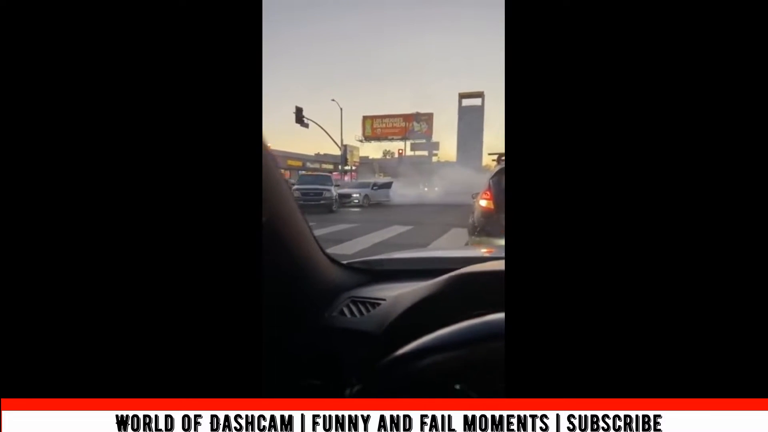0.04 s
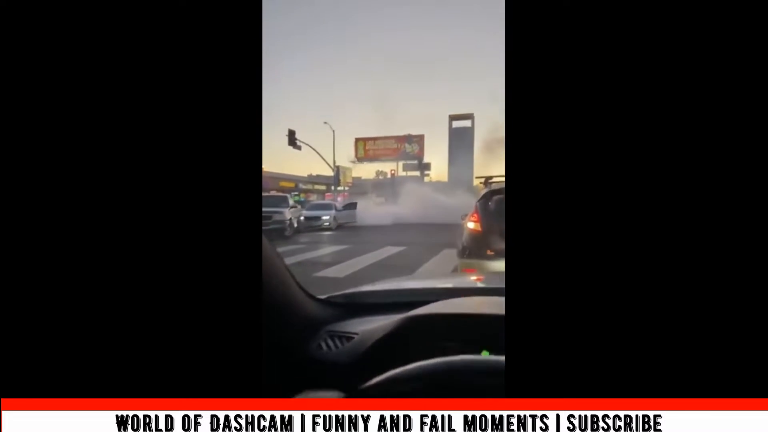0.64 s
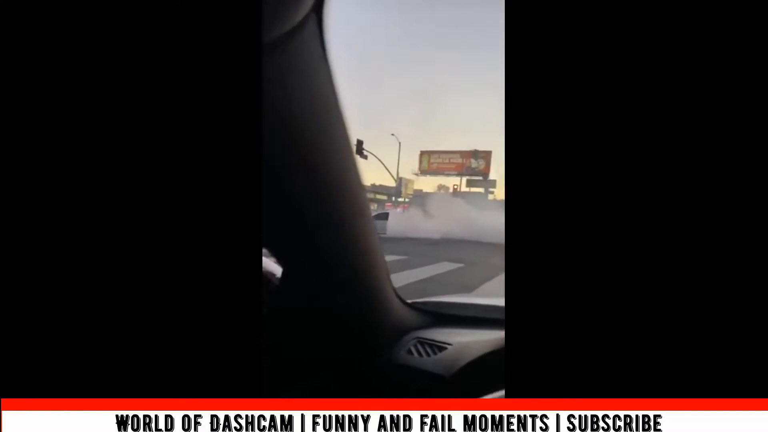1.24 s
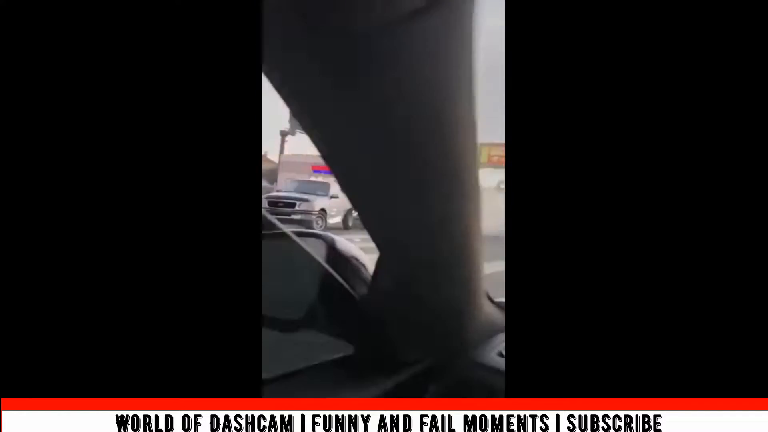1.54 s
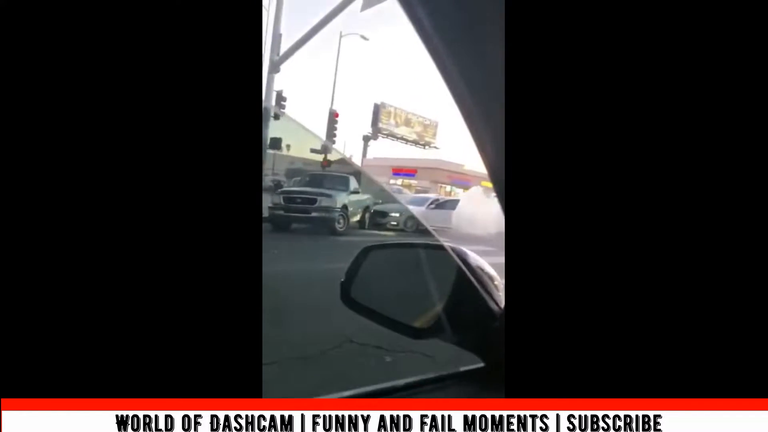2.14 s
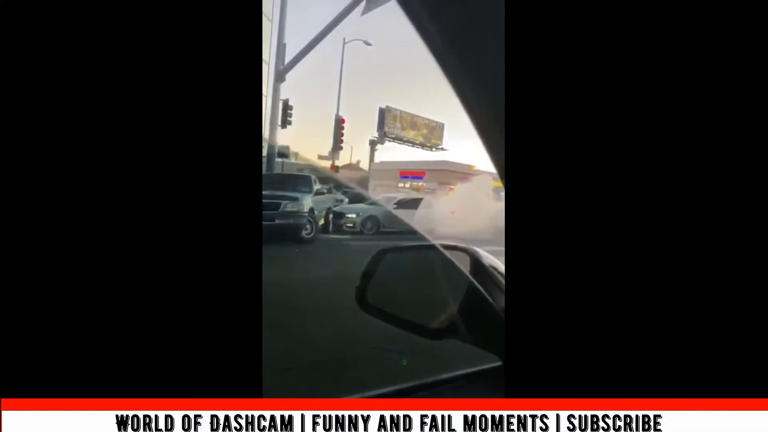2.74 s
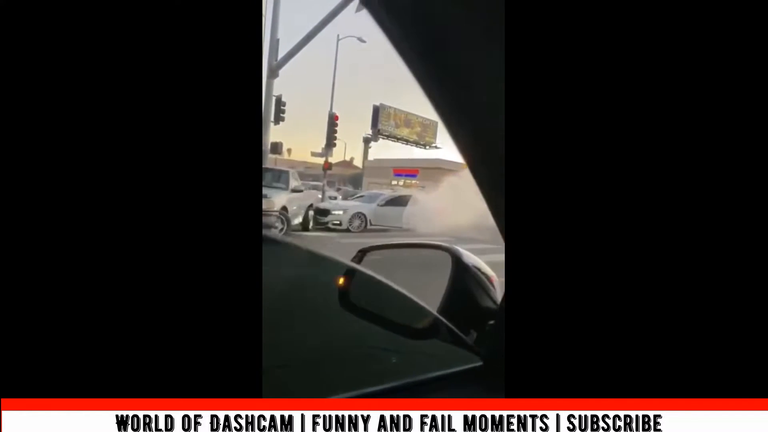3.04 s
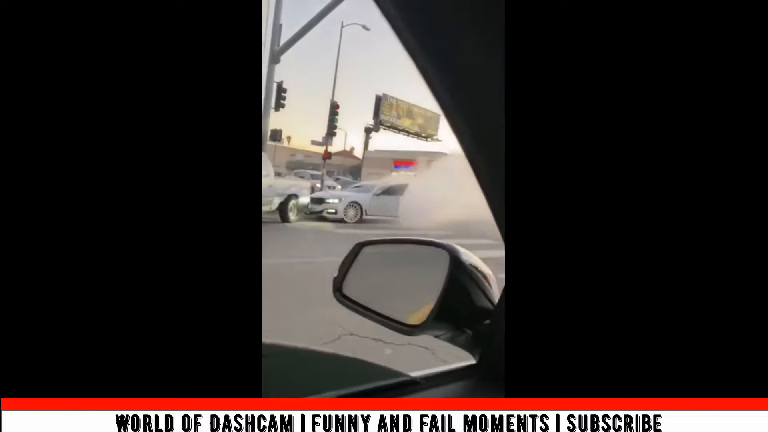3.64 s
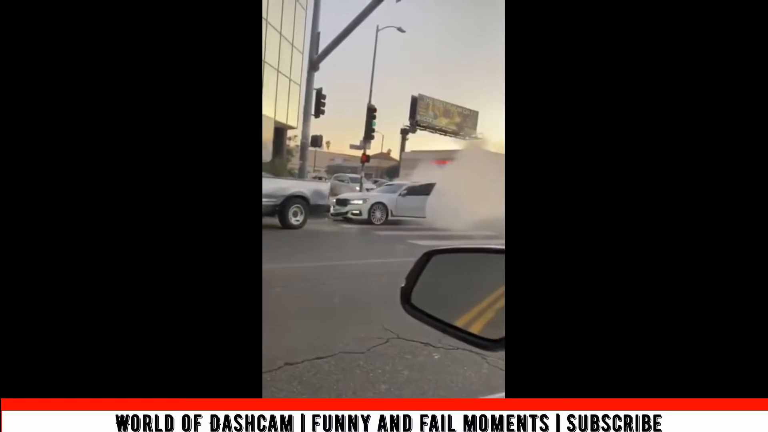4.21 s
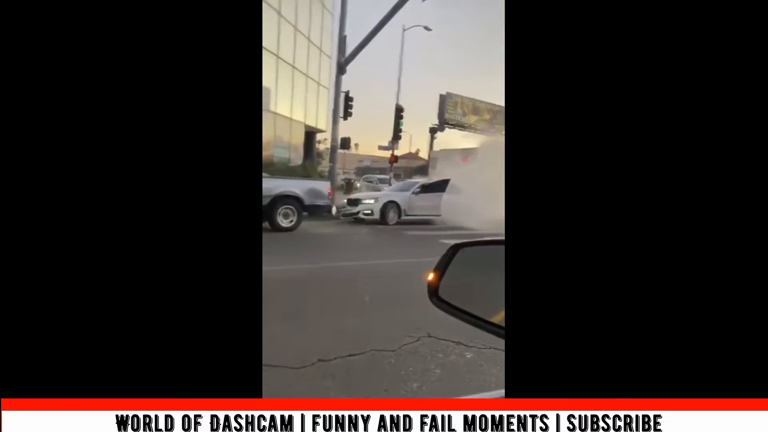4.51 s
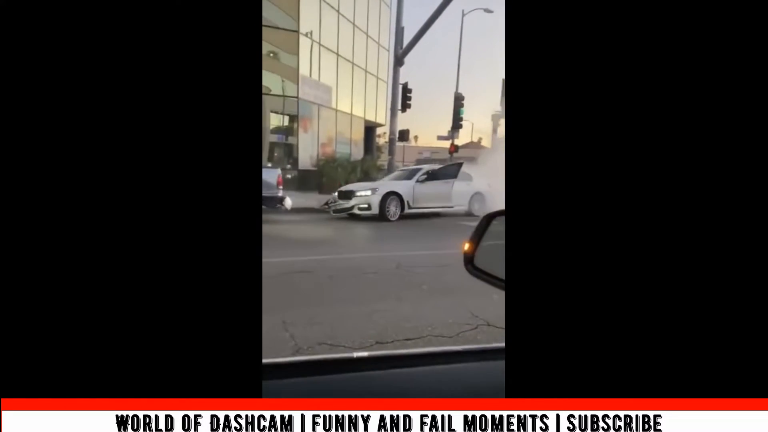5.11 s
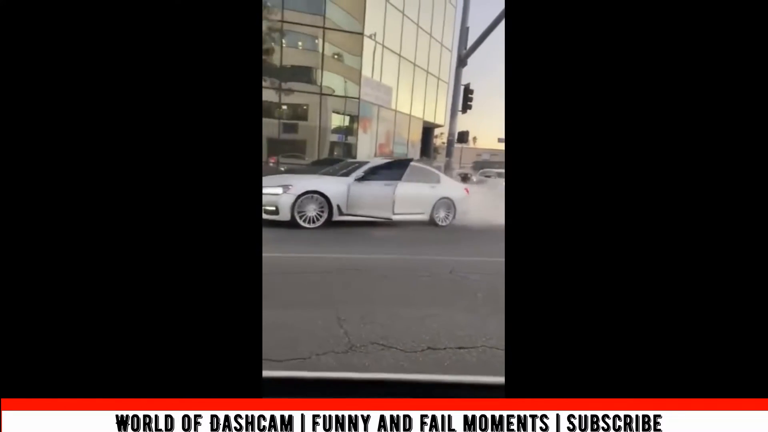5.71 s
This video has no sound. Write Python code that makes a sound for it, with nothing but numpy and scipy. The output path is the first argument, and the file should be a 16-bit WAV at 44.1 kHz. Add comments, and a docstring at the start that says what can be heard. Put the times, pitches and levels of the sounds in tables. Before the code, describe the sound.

From the start, car tyres squeal on asphalt in a long, wavering, rasping screech as a car spins donuts, heard through a nearby car's open window. A low engine burbles underneath. The squeal judders and chirps, growing strongest and growling at around 1.5 to 2 seconds, where a gust of air, a cloth rustle and a knock come in. At about 3 seconds the screech breaks into last chirps, gone by 3.5. Between 2.8 and 3.5 seconds wind booms at the window, with rustling and a cluster of close knocks and bumps in the cabin. The engine then settles into a throbbing idle, with a few scattered light knocks and a faint tyre scuff near 5 seconds. A two-tone horn gives two short toots at about 5 and 5.5 seconds, echoing briefly off the buildings over the idle and more soft gusts.

```python
"""Two rear tyres squeal as a car spins donuts at a crossing, heard through a nearby car's open window.
Their tread sticks and slips on the asphalt, singing, juddering and scrubbing, then chirps as it grips.
Low engine tones burble underneath and settle into one V8's throbbing idle.
Air buffets and booms at the window, cloth rustles and a few knocks and bumps sound in the cabin.
Near the end, the buzzing diaphragms of a two-tone horn toot twice between the buildings."""
import sys
import numpy as np
from scipy import signal
from scipy.fft import rfft, irfft, next_fast_len
from scipy.io import wavfile

SR = 44100
rng = np.random.default_rng(int(sys.argv[2]) if len(sys.argv) > 2 else 0)


def wav_out(sig):
    """Save sig, one row per channel (or a flat mono array), as 16-bit PCM at SR to the path in sys.argv[1]."""
    wavfile.write(sys.argv[1], SR, np.round(np.clip(np.atleast_2d(sig).T, -1, 1) * 32767).astype(np.int16))


N = 258426
TIME = np.arange(N) / SR

# Levels in the tables are relative: each layer is trimmed and coloured further on.
# noise colours of wind, rough tyre noise, hiss and road rumble: f/Hz, density/dB
BUFFET_COLOUR = [(60, -28), (110, 2), (170, 2), (280, -4), (410, -4), (560, -8.5), (800, -26), (1200, -50),
                 (2500, -49.5)]
TYRE_NOISE_COLOUR = [(300, 8.5), (500, -6), (700, 6), (1080, 11.5), (1500, -5.5), (2000, 16), (2800, -10.5),
                     (3600, -35), (5000, -7.5)]
HISS_COLOUR = [(1500, -6), (2800, 11.5), (4000, 9.5), (4800, 4.5), (5600, 3), (7500, 7.5), (10000, -1.5),
               (12500, -2), (14500, -3.5), (16000, -16)]
RUMBLE_COLOUR = [(22, -26), (30, -30), (40, 9), (60, -4), (100, -3.5), (185, -10), (260, -23), (500, -24)]
# stereo width of the noise beds: f/Hz, left-right correlation
STEREO_LIKENESS = [(40, 1), (120, 1), (250, 1), (500, 0.99), (1000, 0.83), (2000, 0.99), (4000, 0.48),
                   (8000, 1), (14000, 0.78)]
# rough tyre noise swelling out of a faint street wash: t/s, level/dB
TYRE_NOISE_LEVEL = [(0, -40.5), (1.2, -38.5), (1.9, -26), (2.2, -46.5), (2.75, -39.5), (3.05, -29.5),
                    (3.45, -36.5), (3.65, -42.5), (4.2, -43.5), (4.6, -42), (4.95, -40), (5.4, -41.5),
                    (5.86, -39.5)]
# gusts at the window and rustles of cloth: peak t/s, fall time/s, level/dB
GUSTS = [(1.85, 0.073, -23.5), (2.0, 0.029, -35), (2.9, 0.095, -25.5), (3.0, 0.034, -24.5),
         (3.2, 0.018, -32), (3.335, 0.096, -32), (3.5, 0.041, -23), (5.14, 0.14, -29.5), (5.76, 0.34, -28)]
RUSTLES = [(.5, 0.03, -48), (1.04, 0.016, -45.5), (1.25, 0.066, -58), (1.965, 0.033, -32.5),
           (2.155, 0.02, -39.5), (2.305, 0.014, -45.5), (2.862, 0.12, -44), (3.01, 0.017, -33),
           (3.08, 0.04, -36), (3.2, 0.012, -34), (3.33, 0.067, -37), (3.482, 0.046, -41),
           (3.695, 0.018, -49)]
# bumps on the door panel: t/s, level/dB
DOOR_BUMPS = [(2.827, -25), (2.847, -24.5), (2.865, -22), (2.912, -19), (2.938, -20.5), (2.964, -17),
              (2.981, -23), (3.002, -18), (3.043, -15), (3.057, -24), (3.485, -16), (3.522, -30)]
# the panel's modes: f/Hz, level/dB, t60/s
DOOR_MODES = [(125.3, -1, 0.18), (152, -1.5, .07), (205.4, -5.5, 0.065), (276, -0.5, 0.076),
              (357, -9, 0.038), (486, -12, 0.032), (692, -8, 0.037)]
# cabin knocks and, last, a slap after the first toot: t/s, crack level/dB, f/Hz, thud level/dB, t60/s
KNOCKS_AND_SLAP = [(1.953, -29, 7330, -28, 0.14), (2.152, -57, 8020, -55, 0.15),
                   (2.769, -30, 4800, -44.5, 0.075), (2.844, -27.5, 3900, -38, 0.11),
                   (2.982, -29, 5920, -27, 0.058), (2.996, -26, 4530, -19, 0.039),
                   (3.009, -26, 4030, -22, 0.097), (3.028, -29.5, 5090, -31, 0.11),
                   (3.047, -27, 4500, -34, 0.038), (3.094, -21, 5000, -40, 0.016),
                   (3.192, -50, 8570, -29, 0.075), (3.267, -36, 4530, -48, .03),
                   (3.303, -24.5, 3860, -50, 0.072), (3.307, -37, 12100, -51, .11),
                   (3.346, -26.5, 2930, -60, 0.11), (3.478, -21.5, 4670, -23, 0.095),
                   (3.695, -35, 4480, -33, 0.06), (3.979, -27, 2473, -22.5, 0.033),
                   (4.18, -45, 5994, -31, 0.039), (4.492, -42, 7100, -31, 0.039),
                   (4.679, -27.5, 11200, -26, 0.091), (4.783, -40.5, 10270, -53, 0.05),
                   (5.287, -35, 2815, -42, 0.22)]

# the idling V8's hum: multiple of its cycle rate, level/dB
IDLE_ORDERS = [(4, -8.5), (6, 1.5), (8, 4.5), (10, -0.5), (11, -1.5), (12, -5), (13, 1), (15, -5.5),
               (16, -1), (17, -7.5), (18, -9)]
# the lower engine tone, settling into the idle: t/s, f/Hz
BURBLE_PITCH = [(0, 52.2), (.55, 53.6), (.85, 57.6), (1.3, 66.53), (1.85, 74.5), (2.2, 83.06),
                (2.65, 94.43), (3.0, 80.9), (3.5, 77), (4.0, 77.67), (4.6, 76.13), (5.86, 76.38)]
# exhaust burble, plus booming gusts at 3.0 and 3.51 s: t/s, note level/dB, overtone level/dB
BURBLE_AND_GUST_LEVELS = [(0, -27, -44), (.47, -37.5, -39), (.69, -20, -37), (.87, -24, -30),
                          (.96, -40, -28.5), (1.3, -25, -25.5), (1.65, -30, -24.5), (1.78, -36, -38),
                          (1.87, -27, -30), (2.12, -40, -44), (2.8, -30, -44), (3.0, -43, -16),
                          (3.15, -56, -78), (3.4, -37, -40), (3.51, -33, -23), (3.62, -30, -30.5),
                          (4.4, -30, -28.5), (5.86, -25.5, -29.5)]
# the burble's overtones: f in sixths of the note, level/dB
BURBLE_ORDERS = [(7, -31), (9, -3), (10, -4), (11, 0.5), (12, 1.5), (13, -18.5), (15, -13.5), (16, -3),
                 (17, -24), (18, -15.5), (22, -23.5), (24, -14.5)]
# the upper engine tone, settling into the idle: t/s, f/Hz
DRONE_PITCH = [(0, 123), (.12, 109), (.25, 104), (.75, 110), (1.1, 108.6), (1.75, 115.4), (2.1, 110),
               (2.7, 108), (3.0, 103), (3.15, 119), (3.33, 117), (3.5, 125), (3.7, 109), (3.9, 107.4),
               (4.3, 97.6), (4.7, 99), (5.2, 101.6), (5.86, 103)]
# its strength: t/s, fundamental level/dB, third harmonic level/dB
DRONE_LEVELS = [(0, -51, -49), (.08, -44, -39), (.2, -30, -53), (.65, -30, -49), (.8, -34, -40.5),
                (1.08, -44, -41.5), (1.35, -23, -50), (1.66, -28.5, -44), (1.87, -21, -46),
                (2.12, -40, -51.5), (2.8, -30, -42), (3.15, -22, -51), (3.47, -17.5, -36),
                (3.62, -33, -39.5), (3.8, -28.5, -51), (4.4, -21, -57), (4.9, -31, -39), (5.45, -26.5, -41),
                (5.86, -25, -28)]
# horn presses: t/s, length/s, level/dB, blare boost/dB, echo delay/s, echo level/dB
TOOTS = [(5.043, 0.089, 1, 2.5, 0.051, -8.5), (5.504, 0.095, 1, 3.5, .07, -16)]
# the low and the high horn: f/Hz, level/dB of each harmonic
HORNS = [(401, [-49, -36, -47, -55, -42, -46, -58, -65, -69, -61, -59, -72]),
         (498.5, [-35.5, -37.5, -36, -45, -47, -67, -53, -56, -64, -71, -55, -59])]

# toneless scuffs as the car turns away: peak t/s, fall time/s, level/dB
SCUFFS = [(4.9, 0.24, -43.5), (5.12, 0.052, -39)]
# rubber squeaks: middle t/s, length/s, starting f/Hz, level/dB
SQUEAKS = [(0.563, 0.0231, 3010, -37), (1.199, 0.02, 3220, -34.5), (2.718, 0.03, 3300, -28)]
# tyre wall resonances: f/Hz, width/Hz, slide level/dB, bite level/dB
TYRE_WALL_MODES = [(755, 470, -5, -15), (1070, 200, -8, 13), (1470, 340, -6, 5), (1880, 330, 0, 3.5),
                   (2427, 710, 1, 4.5), (3400, 600, -24, -4.5), (4030, 470, -13, -9)]
# tread bites: t/s, length/s, f/Hz, fundamental level/dB, octave level/dB, judder level/dB, glide/(Hz/s)
BITES = [(.2, 0.037, 997, -42, -26.5, -51, 49.5), (.385, 0.038, 993, -26, -46, -58, -300),
         (.44, .045, 925, -21, -31, -57, 405.5), (.69, 0.04015, 891, -30, -26.5, -57, 193),
         (.92, 0.04505, 1026, -29, -55, -56, 99), (1.253, .014, 825, -44, -20.5, -49, 199),
         (1.418, 0.0142, 833.6, -25, -18.5, -50, 199), (1.66, 0.0204, 814.4, -32, -16.5, -53, 298.5),
         (1.875, 0.0298, 880, -30, -27, -46, 499), (1.99, 0.031, 893, -20.5, -12, -33, 1097),
         (2.06, 0.0268, 805, -23, -30, -50, 199), (2.186, 0.051, 958, -25, -25, -38, -500),
         (2.285, .025, 912, -31, -30, -38, 495), (2.48, 0.03, 1015, -17.5, -44, -52, 200),
         (2.545, 0.048, 1035, -19.5, -36, -45, 100), (2.68, 0.035, 1067, -24, -27, -35, 1000),
         (2.758, .008, 951, -18.5, -36, -32, 1397), (3.0, .02, 1030, -37, -30, -30, 1400),
         (3.05, 0.019, 1116, -32, -38.5, -24, 1400), (3.092, 0.0088, 1052, -31, -28, -9.5, 1400),
         (3.104, 0.0029, 1045, -11, -27, -20.5, 1398), (3.12, 0.0029, 1071, -13, -22, -20, 1400),
         (3.142, 0.0036, 1197, -34, -43, -39, 1400), (3.162, 0.0098, 1163, -24, -34, -18, 1399),
         (3.188, 0.022, 1011, -12.5, -17, -20.5, 1398), (3.24, 0.041, 1085, -23, -26, -42, 1796),
         (3.448, 0.058, 965, -24.5, -45, -29.5, 1400)]
# growl of the tread under heavy load: t/s, level/dB
GROWL_LEVEL = [(0, -54), (.6, -45), (.72, -40.5), (.8, -52), (1.02, -36), (1.12, -47), (1.35, -36),
               (1.55, -41), (1.72, -23.5), (1.8, -26.5), (1.89, -18), (2.0, -44), (2.2, -44), (2.65, -54),
               (2.85, -65)]
# the inner tyre's stick-slip: t/s, f/Hz, level/dB added to the slide
INNER_SLIP = [(0, 875, -1.5), (.15, 847, 1), (.23, 882, 5), (.31, 942, 2), (.38, 895, 5), (.47, 924, -4.5),
              (.62, 878, 3.5), (.75, 840, -0.5), (.9, 871, -10.5), (1.1, 834, -5.5), (1.33, 810.7, 0),
              (1.55, 828.8, 0), (1.72, 839, -2), (1.87, 848, -1.5), (2.07, 817, -6), (2.25, 888, -1),
              (2.38, 822, 2), (2.47, 861, -2), (2.63, 850, -1), (2.76, 928, -1.5)]
# its shoulders slip below and above that rate: pitch ratio, level/dB
SHOULDERS = [(.91, -5), (1.12, -2.5)]
# the outer tyre's stick-slip: t/s, f/Hz
OUTER_PITCH = [(0, 915), (.09, 995), (.15, 975), (.23, 998), (.33, 965), (.4, 980), (.47, 938), (.58, 912),
               (.66, 882), (.85, 888), (1.05, 866), (1.12, 828), (1.19, 878), (1.27, 836), (1.45, 835),
               (1.58, 852), (1.67, 832), (1.73, 858), (1.79, 848), (1.89, 892), (1.96, 875), (2.04, 945),
               (2.12, 850), (2.2, 948), (2.27, 908), (2.32, 925), (2.41, 890), (2.48, 1015), (2.57, 1045),
               (2.65, 988), (2.75, 1110)]
# how hard the tyres slide: t/s, level/dB, octave offset/dB, third harmonic offset/dB
SLIDE_LEVELS = [(0, -25, -5, -1.5), (.22, -26.5, -4, -3.5), (.54, -22.5, -8, -8), (.63, -29, -6, -12),
                (.95, -23.5, -8.5, -11), (1.14, -28, -3, -12), (1.3, -24.5, -2.5, -7.5),
                (1.46, -24, -5.5, -10.5), (1.54, -20, 1, -10), (1.89, -17.5, 2.5, -12),
                (2.08, -20.5, -10, -26), (2.25, -23, 2.5, -8.5), (2.42, -23.5, -8.5, -17.5),
                (2.5, -21.5, -3, -13.5), (2.74, -21.5, -1, -3.5), (2.82, -29.5, -7, -38),
                (2.9, -30, 1.5, -14), (3.1, -72, -4, -19)]

# slaps off the buildings: delay/s, level/dB
FACADE_ECHOES = [(0.024, -9), (0.049, -31), (0.082, -42), (0.178, -20.5)]
# peaks and notches of window opening and cabin: f/Hz, width/Hz, gain/dB
WINDOW_EQ = [(512, 94, -19.5), (1360, 77, -1), (1497, 68, -6), (2660, 106, 1.5), (2950, 540, -14),
             (3250, 120, -1.5), (3880, 250, -0.5), (3950, 99, 0), (5040, 1150, -11)]
# the street's pan as the microphones turn: t/s, left minus right level/dB
STREET_PAN = [(0, 6.5), (.6, 7.5), (1.25, 12), (1.7, -0.5), (2.3, -1.5), (3.7, 2.5), (4.3, 10), (4.9, 0.5),
              (5.86, 1)]
# mismatch of the two microphone ports: f/Hz, left's phase lead/rad, left minus right level/dB
PORT_MISMATCH = [(60, .03, 0), (150, .03, 0), (330, -.22, 1.4), (650, -.52, 0), (1200, -.1, 0),
                 (2200, .42, -1.4), (3200, 1.65, -3.2), (4400, 1.55, -1.5), (6000, .6, -.3), (9000, .2, 0)]


def from_db(db):
    """Decibels to gain."""
    return np.exp(np.asarray(db) * (np.log(10) / 20))


def rms_one(x):
    """Scale to unit power."""
    return x / np.sqrt(np.mean(x ** 2) + 1e-20)


def in_time(rows):
    """Each column of an automation curve at every sample."""
    times, *columns = np.transpose(rows)
    return [np.interp(TIME, times, column) for column in columns]


def at_hz(points, hz):
    """Read a spectrum on a log-frequency axis."""
    freqs, values = np.transpose(points)
    return np.interp(np.log(hz), np.log(freqs), values)


def drift(rate_hz):
    """Smooth random modulation with a spread of 1."""
    hop, settle = 20, 4000
    pole = np.exp(-2 * np.pi * hop * rate_hz / SR)
    white = rng.standard_normal(N // hop + settle + 2)
    slow = signal.lfilter([1], [1, -2 * pole, pole * pole], white)[settle:]
    return np.interp(np.arange(N) / hop, np.arange(len(slow)), rms_one(slow))


def band(x, low_hz, high_hz):
    """Butterworth band-pass."""
    sos = signal.butter(2, [low_hz, min(high_hz, SR * .45)], "band", fs=SR, output="sos")
    return signal.sosfilt(sos, x + 1e-18)


def phase_of(hz):
    """Running phase of a gliding tone."""
    return 2 * np.pi * (np.cumsum(hz) / SR + rng.random())


def delayed(x, delay_s):
    """One delay tap."""
    return np.interp(TIME - delay_s, TIME, x, left=0)


def swells(rows, rise):
    """Gain envelope of swells that grow and die away; rise is a share of the fall time."""
    return sum(from_db(db) * np.exp(-np.minimum(np.maximum((s - TIME) / rise, TIME - s) / fall, 50))
               for s, fall, db in rows)


def street(x, echo_db, tail_db, cabin_db):
    """Slaps off the buildings, a diffuse tail, and short cabin scatter that differs at each ear."""
    street_t60, cabin_t60 = 0.81, 0.05
    echoes = sum(from_db(db + echo_db) * delayed(x, delay) for delay, db in FACADE_ECHOES)
    tail = rng.standard_normal(SR) * from_db(-60 * TIME[:SR] / street_t60)
    cabin = rng.standard_normal((2, SR)) * from_db(-60 * TIME[:SR] / cabin_t60)
    tail *= from_db(tail_db) / np.linalg.norm(tail)
    cabin *= from_db(cabin_db) / np.linalg.norm(cabin[0])
    early = x + echoes
    return early + signal.fftconvolve(early[None], tail + cabin, axes=1)[:, :N]


def noise_bed(colour, flicker_db):
    """Half-octave bands of stereo noise that flicker partly together; rms 1."""
    out, together = 0, drift(14)
    edges = 22 * 2 ** np.arange(0, 10, .5)
    white = rng.standard_normal((2, 2, N))
    for k, (low, high) in enumerate(zip(edges, edges[1:])):
        hz = np.sqrt(low * high)
        if high > colour[0][0] and low < colour[-1][0]:
            mid, side = band(white[k % 2], low, high)
            alike = at_hz(STEREO_LIKENESS, hz)
            gain = from_db(at_hz(colour, hz) + flicker_db * (together + 1.5 * drift(13)))
            out += gain * (np.sqrt(1 + alike) * mid + np.sqrt(1 - alike) * side * [[1], [-1]])
    return rms_one(out)


def port_air():
    """Air moves over each microphone port on its own: a faint, wide rumble."""
    return from_db(-59) * rms_one(band(rng.standard_normal((2, N)), 30, 170))


def road_noise():
    """Rough midrange tyre noise swells at the squeal's peaks, over a faint street wash and rumble."""
    rough_db, = in_time(TYRE_NOISE_LEVEL)
    rough = from_db(rough_db) * noise_bed(TYRE_NOISE_COLOUR, flicker_db=1)
    return rough + from_db(-33.5) * noise_bed(RUMBLE_COLOUR, flicker_db=0.7)


def air_and_cloth():
    """Air buffets and hisses at the window; cloth rustles close by, crackling with tiny catches."""
    step_s = (3.05, 2.878)   # the steady air steps up around here
    draught = from_db(np.interp(TIME, step_s, (-45.5, -36)))
    steady_hiss = from_db(np.interp(TIME, step_s, (-55, -51.5)))
    buffet = np.hypot(draught, swells(GUSTS, rise=0.72)) * noise_bed(BUFFET_COLOUR, flicker_db=1)
    rustle = swells(RUSTLES, rise=1) * rms_one(from_db(0.5 * drift(190)))
    return buffet + np.hypot(steady_hiss, rustle) * noise_bed(HISS_COLOUR, flicker_db=1.1)


def door_bumps():
    """Each bump rings the door panel briefly, every mode with a strength of its own."""
    age = TIME[:SR // 4]
    out = np.zeros(N)
    for s, db in DOOR_BUMPS:
        strengths = from_db(db + rng.normal(0, 3.2, len(DOOR_MODES)))
        strengths *= rng.choice([-1, 1], len(DOOR_MODES))
        start = int(s * SR)
        for strength, (hz, mode_db, t60) in zip(strengths, DOOR_MODES):
            ring = from_db(mode_db - 60 * age / t60) * np.sin(2 * np.pi * hz * age)
            out[start:start + len(age)] += strength * ring
    return out


def knocks_and_slap():
    """Cabin knocks and a short bright slap after the first toot: each a crack over a dull thud."""
    attack_cycles = 18   # so brighter hits are sharper
    age = TIME[:SR // 2]
    out = np.zeros((2, N))
    for s, crack_db, hz, thud_db, t60 in KNOCKS_AND_SLAP:
        grit = rng.standard_normal(len(age)) + 0.64 * rng.standard_normal((2, len(age)))
        thud = rms_one(band(rng.standard_normal(len(age)), 150, 1800))
        crack = rms_one(band(grit, hz * 0.52, hz * 1.13) + 0.18 * band(grit, 1400, 11300))
        envelope = np.clip(age * hz / attack_cycles, 0, 1) * from_db(-60 * age / t60)
        start = int(s * SR)
        out[:, start:start + len(age)] += envelope * (from_db(crack_db) * crack + from_db(thud_db) * thud)
    return out


def idling_engine():
    """A V8 ticks over close by: an even, throbbing hum on multiples of its cycle rate."""
    cycle_hz, trim_db = 12.8, -42.5
    cycle = phase_of(cycle_hz * (1 + .004 * drift(3)))
    return sum(np.sqrt(2) * from_db(trim_db + db) * np.sin(order * cycle + 2 * np.pi * rng.random())
               for order, db in IDLE_ORDERS)


def partial(phase, level_db, waver_db=0):
    """One sine partial whose level can waver."""
    return np.sqrt(2) * from_db(level_db + waver_db * drift(2.6)) * np.sin(phase)


def burble_and_gusts():
    """Uneven cylinders burble and settle into the idle; two surges boom as gusts at the window."""
    hz, = in_time(BURBLE_PITCH)
    note_db, overtone_db = in_time(BURBLE_AND_GUST_LEVELS)
    note = phase_of(hz * (1 + 0.01448 * drift(15.1)))
    out = partial(note, note_db - 2) + from_db(note_db - 10) * np.sin(note / 2)
    for sixths, db in BURBLE_ORDERS:
        out += partial(sixths * note / 6 + 2 * np.pi * rng.random(), overtone_db + db - 6.5)
    return out


def engine_drone():
    """A low engine tone with two wavering overtones sinks and settles into the V8's idle."""
    hz, = in_time(DRONE_PITCH)
    boom_db, third_db = in_time(DRONE_LEVELS)
    phase = phase_of(hz * (1 + 0.003 * drift(18)))
    return (partial(phase, boom_db - 1, waver_db=0.74)
            + partial(2 * phase, boom_db - 18, waver_db=4)
            + partial(3 * phase, third_db - 4, waver_db=5.5))


def horn():
    """Two diaphragms buzz a major third apart; reflections make each toot's partials swell unevenly."""
    attack_s, release_t60 = 0.028, 0.04
    blare_hz, blare_octaves = 1900, 0.64
    out = 0
    for s, length, toot_db, blare_db, echo_s, echo_db in TOOTS:
        toot = 0
        for hz, harmonics in HORNS:
            phase = phase_of(hz * (1 + 0.003 * drift(22.8) + 0.007 * drift(303)))
            for k, db in enumerate(harmonics, 1):
                boost_db = blare_db * np.exp(-(np.log2(k * hz / blare_hz) / blare_octaves) ** 2)
                toot += np.sqrt(2) * from_db(db + boost_db + 1.5 * drift(14)) * np.sin(k * phase)
        release_db = -60 * np.maximum(TIME - s - length, 0) / release_t60
        toot *= np.clip((TIME - s) / attack_s, 0, 1) * from_db(toot_db + release_db)
        far_echo = from_db(-21) * delayed(band(toot, 1220, 1790), .15)   # a far wall returns only mids
        near_echo = from_db(echo_db) * delayed(toot, echo_s)
        out += street(toot + far_echo + near_echo, echo_db=-10, tail_db=-6.5, cabin_db=-10.5)
    return out


def scrub(effort_db):
    """Rubber drags over the grit: a dry hiss that grows with the slide, then two late scuffs."""
    hiss_hz, scuff_hz = (2590, 4900), (2100, 3297)
    hiss = rms_one(band(band(rng.standard_normal(N), *hiss_hz), *hiss_hz))
    scuff = rms_one(band(rng.standard_normal(N), *scuff_hz))
    return from_db(-63 + 0.94 * effort_db) * hiss + swells(SCUFFS, rise=0.97) * scuff


def squeaks():
    """Single tread blocks give a quick rising squeak."""
    rise_hz_per_s = 5400
    out = 0
    for s, length, start_hz, db in SQUEAKS:
        age = np.clip(TIME - s + length / 2, 0, length)
        phase = phase_of(start_hz + rise_hz_per_s * age + 90 * drift(400))
        out += from_db(db) * np.sin(np.pi * age / length) * np.sin(phase)
    return out


def judder(sliding_db, biting_db):
    """Irregular slips of tread blocks ring the tyre wall, with one colour sliding and another biting."""
    slips_per_s = 2500
    slips = (rng.random(N) < slips_per_s / SR) * rng.standard_normal(N)
    slide = bite = 0
    for hz, width, slide_db, bite_db in TYRE_WALL_MODES:
        edges = hz - width / 2, hz + width / 2
        ring = rms_one(band(band(slips, *edges), *edges))
        slide += from_db(slide_db) * ring
        bite += from_db(bite_db) * ring
    return from_db(sliding_db) * rms_one(slide) + from_db(biting_db) * rms_one(bite)


def bite_curves():
    """The tread bites, glides, sags and lets go: pitch, then dB of fundamental, octave and judder."""
    attack_s, sag_db_per_s, release_db_per_s = .011, 54, 613
    hz, gains = np.full(N, float(BITES[0][2])), 1e-6
    for s, length, start_hz, *levels_db, glide in BITES:
        age = TIME - s
        hz = np.where(age > -attack_s, start_hz + glide * np.minimum(age, 2 * length), hz)
        fall_db = sag_db_per_s * np.maximum(age, 0) + release_db_per_s * np.maximum(age - length, 0)
        envelope = np.clip(1 + age / attack_s, 0, 1) * from_db(-np.minimum(fall_db, 120))
        gains += from_db(levels_db)[:, None] * envelope
    return hz, *(20 * np.log10(gains))


def through_window(x):
    """The window opening and cabin colour the squeal with a chain of peaks and notches."""
    for hz, width, db in WINDOW_EQ:
        gain, half_width = from_db(db / 2), np.pi * width / SR
        tuning = -2 * np.cos(2 * np.pi * hz / SR)
        x = signal.lfilter([1 + half_width * gain, tuning, 1 - half_width * gain],
                           [1 + half_width / gain, tuning, 1 - half_width / gain], x)
    return x


def stick_slip(hz, levels_db, waver, rasp, trims_db, flutter_db=2.8):
    """Tread sticks and slips: its pitch wanders with the asphalt, its level flutters with the grip."""
    first, octave, third = levels_db
    octave_trim, third_trim, fourth_trim = trims_db
    fourth = (octave + third) / 2 + fourth_trim
    phase = phase_of(hz * (1 + waver * drift(24.04) + rasp * drift(254.4)))
    grip = drift(77)
    out = 0
    for k, db in enumerate([first, octave + octave_trim, third + third_trim, fourth, fourth - 4], 1):
        flutter = rms_one(from_db(flutter_db * (grip + 1.35 * drift(72))))
        smear_rad = 0.28 * min(k - 1, 3) * drift(170)   # grit roughens the overtones
        out += from_db(db) * flutter * np.sqrt(2) * np.sin(k * phase + smear_rad)
    return out


def inner_tyre(levels_db):
    """The inner tyre sings lower, with hoarse shoulders that slip independently."""
    hz, offset_db = in_time(INNER_SLIP)
    tone = stick_slip(hz, levels_db, waver=.018, rasp=.022, trims_db=(1.5, -1, -14))
    for ratio, db in SHOULDERS:
        tone += from_db(db) * stick_slip(ratio * hz, levels_db, waver=.035, rasp=.022,
                                         trims_db=(-4, 0, -19))
    return from_db(offset_db) * tone


def tread_growl():
    """Under heavy load the tread growls below the squeal."""
    db, = in_time(GROWL_LEVEL)
    return stick_slip(hz=723, levels_db=(db, db - 11, db - 16), waver=.03, rasp=.025,
                      trims_db=(0, 0, -22))


def tyre_squeal():
    """The loaded outer tyre sings clearly and chirps as it bites, over the rougher tyre layers."""
    outer_hz, = in_time(OUTER_PITCH)
    slide_db, octave_db, third_db = in_time(SLIDE_LEVELS)
    effort_db = slide_db + 19.5   # 0 dB in an ordinary slide
    levels_db = slide_db, slide_db + octave_db, slide_db + third_db
    outer = stick_slip(outer_hz, levels_db, waver=.009, rasp=.009, trims_db=(2.5, 5.5, -15), flutter_db=3)
    inner = inner_tyre(levels_db)
    growl = tread_growl()
    bite_hz, bite_db, bite_octave_db, bite_judder_db = bite_curves()
    chirps = stick_slip(bite_hz, (bite_db, bite_octave_db, bite_octave_db - 12),
                        waver=.008, rasp=.012, trims_db=(1, -2, -21), flutter_db=1.7)
    tones = from_db(-6) * outer + from_db(-7) * inner + from_db(-2.5) * growl + from_db(-1) * chirps
    shudder = judder(sliding_db=-31 + 2.84 * effort_db, biting_db=bite_judder_db)
    tyres = through_window(tones + shudder) + squeaks() + scrub(effort_db)
    return street(tyres, echo_db=-8, tail_db=-16, cabin_db=-11)


def scene():
    """The stereo mix at the window: tyres up front, then engine tones, horn, cabin and noise beds."""
    return (tyre_squeal() + engine_drone() + burble_and_gusts() + idling_engine() + horn()
            + knocks_and_slap() + door_bumps() + air_and_cloth() + road_noise() + port_air())


def microphones(x):
    """Two ports differ in phase and sensitivity; their mids favour the side the sound comes from."""
    mids_low_hz, mids_high_hz = 460, 1250
    size = next_fast_len(N + 4096)
    hz = np.maximum(np.arange(size // 2 + 1) * SR / size, 1)
    ports, sides = np.array(PORT_MISMATCH), np.array([[.5], [-.5]])
    lead_rad, tilt_db = at_hz(ports[:, :2], hz), at_hz(ports[:, ::2], hz)
    spectrum = rfft(x, size) * from_db(sides * tilt_db) * np.exp(1j * sides * lead_rad)
    mid_share = 1 / (1 + (mids_low_hz / hz) ** 8) / (1 + (hz / mids_high_hz) ** 8)
    mids = irfft(spectrum * mid_share, size)[:, :N]
    lows_and_highs = irfft(spectrum * (1 - mid_share), size)[:, :N]
    pan_db, = in_time(STREET_PAN)
    return lows_and_highs + from_db(sides * pan_db) * mids


def record(dry):
    """The microphones lose the deepest bass; peaks are rounded and the top is cut."""
    low_cut_hz, high_cut_hz, ceiling = 32, 15400, 1.3
    heard = signal.lfilter(*signal.butter(2, low_cut_hz, "high", fs=SR), microphones(dry))
    rounded = ceiling * np.tanh(heard / ceiling)
    return signal.sosfilt(signal.ellip(10, .1, 80, high_cut_hz, fs=SR, output="sos"), rounded)


dry = scene()
out = record(dry)
wav_out(out)
```